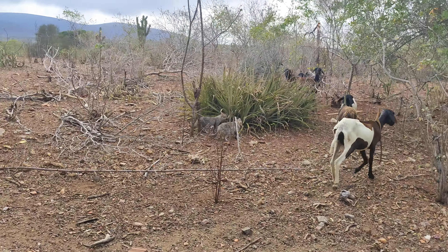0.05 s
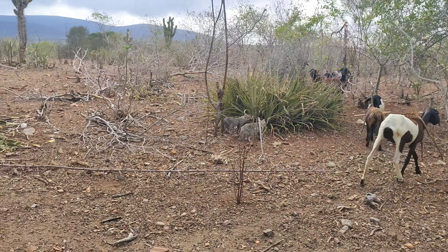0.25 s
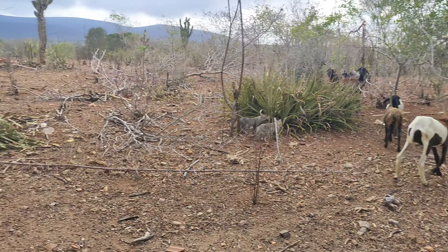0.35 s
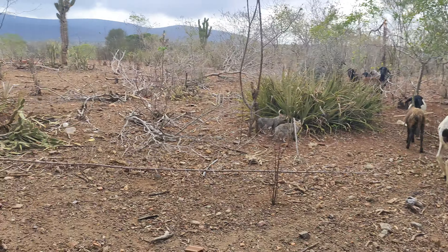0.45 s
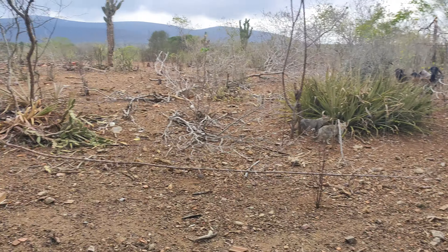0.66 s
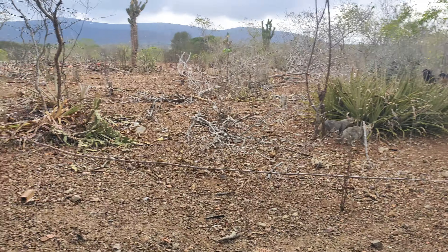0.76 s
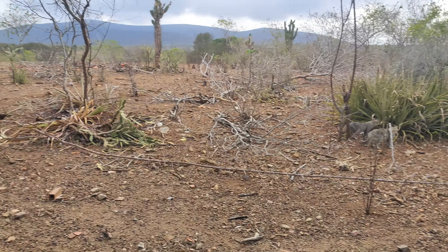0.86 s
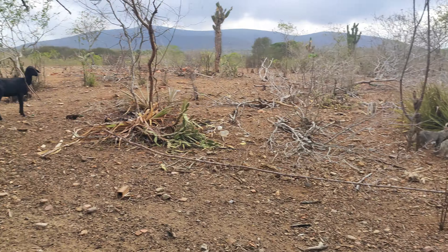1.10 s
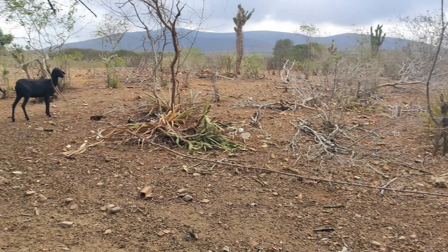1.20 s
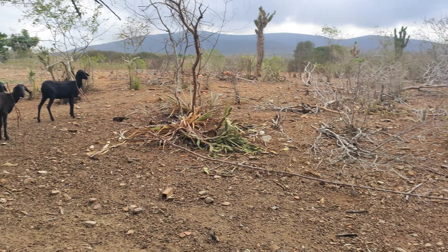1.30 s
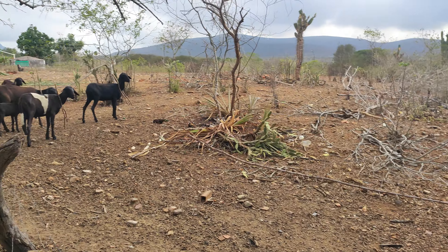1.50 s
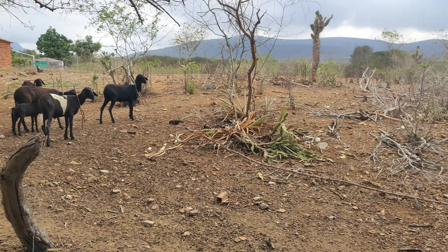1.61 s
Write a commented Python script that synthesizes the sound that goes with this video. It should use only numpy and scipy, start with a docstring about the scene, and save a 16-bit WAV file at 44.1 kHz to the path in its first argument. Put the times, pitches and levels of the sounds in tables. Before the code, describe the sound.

One trembling sheep bleat nearby, then a brief grunt, over faint scuffs and light wind.

```python
"""In dry scrub, a nearby sheep hums with its mouth shut, opens it into one quavering, partly hoarse bleat, then
grunts. Its voice is a source and a filter: pulses from the vocal folds excite the resonances of nose and mouth.
Feet scuff the ground by friction, stones and twigs click, something scrapes briefly late on, and far birds
whistle faintly. A light wind buffets the microphone, which turns away from the animal as it calls."""
import sys
import numpy as np
from scipy import signal
from scipy.fft import rfft, irfft, next_fast_len
from scipy.io import wavfile
from scipy.ndimage import map_coordinates

SR = 44100
rng = np.random.default_rng(int(sys.argv[2]) if len(sys.argv) > 2 else 0)


def output_pcm(signal):
    """Save a mono or channel-first signal as 16-bit PCM at the path in sys.argv[1].

    Samples are clipped to [-1, 1] before scaling.
    """
    pcm = np.clip(np.atleast_2d(signal).T, -1, 1) * 32767
    wavfile.write(sys.argv[1], SR, np.round(pcm).astype(np.int16))


N = 72765
T = np.arange(N) / SR
SIZE = next_fast_len(N + SR // 2)
HZ = np.fft.rfftfreq(SIZE, 1 / SR)


def amp(db):
    """Amplitude ratio for a level in decibels."""
    return 10 ** (np.asarray(db) / 20)

def unit(x):
    """Normalisation to unit rms."""
    return x / np.sqrt(np.mean(x ** 2) + 1e-20)

def spectrum(rows):
    """Interpolation of (f/Hz, value) rows on a logarithmic frequency axis."""
    f, value = np.transpose(rows)
    return np.interp(np.log(HZ + 1), np.log(f + 1), value)

def curve(rows):
    """Linear interpolation of (t/s, value) rows at every sample."""
    return np.interp(T, *np.transpose(rows))

def wobble(per_s):
    """Random modulation: straight lines join per_s Gaussian values a second."""
    return map_coordinates(rng.standard_normal(N), [T * per_s], order=1)

def filtered(x, response):
    """Linear filtering by multiplication of spectra."""
    return irfft(rfft(x, SIZE) * response, SIZE)[..., :N]

def sides(db):
    """Channel gains for a level difference, left minus right."""
    return amp(np.array([db, -db]) / 2).reshape(2, -1)


# Spectra of the hush and the wind: f/Hz, relative level/dB
HUSH_SPECTRUM = [(300, -2), (1400, -10.5), (1800, 0.5), (2250, 6), (2700, -9), (4200, -10.5), (8200, -38),
                 (8900, -17), (12000, -14), (15500, -28)]
WIND_SPECTRUM = [(35, 2), (80, 2), (800, -41.5)]
# Coherence of the hush between channels: f/Hz, correlation
HUSH_COHERENCE = [(100, 0.92), (1500, 0), (4000, 0)]
# Balance of hush and scuffs alike: f/Hz, left minus right level/dB
NOISE_BALANCE = [(1000, 2), (5000, 0), (9000, -17), (11500, -3), (14000, -0.5)]
# Strength of the buffeting: t/s, relative level/dB
WIND_LEVEL = [(0.0, -60.5), (0.776, -62.5), (0.79, -72), (1.65, -74.5)]

def air():
    """Ambient hush is coherent only in the bass; wind turbulence presses on each port independently."""
    angle = np.arccos(np.clip(spectrum(HUSH_COHERENCE), -1, 1)) / 2
    shares = np.array([np.cos(angle), np.sin(angle)])
    mid, side = filtered(rng.standard_normal((2, N)), amp(spectrum(HUSH_SPECTRUM)) * shares)
    hush = unit(filtered(np.array([mid + side, mid - side]), sides(spectrum(NOISE_BALANCE))))
    wind = unit(filtered(rng.standard_normal((2, N)), amp(spectrum(WIND_SPECTRUM))))
    return amp(-58) * hush + amp(curve(WIND_LEVEL) + 5.5) * wind * sides(db=4)


# Distant whistles: onset t/s, duration/s, first f/Hz, middle f/Hz, last f/Hz, level/dB
WHISTLE_NOTES = [(0.2, 0.055, 3700, 2870, 2620, -63), (-.03, 0.104, 2500, 2520, 2190, -55),
                 (0.29, 0.1184, 2270, 2448, 2240, -53)]

def birds():
    """Gliding pure tones, blurred by random phase modulation on their way through the scrub."""
    out = np.zeros(N)
    for start, length, first, middle, last, db in WHISTLE_NOTES:
        progress = np.clip((T - start) / length, 0, 1)
        hz = np.polyval(np.polyfit([0, .5, 1], [first, middle, last], 2), progress)
        phase = 2 * np.pi * np.cumsum(hz) / SR + .7 * wobble(per_s=260)
        arch = np.sqrt(np.abs(np.sin(np.pi * progress)))
        out += amp(db) * arch * np.sin(phase)
    return out * sides(db=6.5)


# Foot strokes: centre t/s, duration/s, level/dB
FOOT_STROKES = [(0.108, 0.024, -48), (0.416, 0.048, -51.5), (0.509, 0.078, -50), (0.72, 0.1, -55),
                (.818, 0.074, -48), (1.126, 0.24, -55.5)]
# Friction noise of dry soil: f/Hz, relative level/dB
FRICTION_SPECTRUM = [(150, -6), (700, -4), (2500, 5), (3300, -4), (6000, -12.5), (8300, -31.5),
                     (8900, -4.5), (11000, -5.5), (15500, -10.5)]

def scuffs():
    """Friction of feet on dry soil gives swells of gritty noise, which add in power."""
    power = sum(amp(db) ** 2 * np.exp(-(2 * (T - centre) / length) ** 2)
                for centre, length, db in FOOT_STROKES)
    grit = amp(3 * wobble(per_s=400)) * rng.standard_normal((2, N))
    response = amp(spectrum(FRICTION_SPECTRUM)) * sides(spectrum(NOISE_BALANCE))
    return np.sqrt(power) * unit(filtered(grit, response))


# Stones and twigs, and a brief scrape at 1.5 s: t/s, level/dB, centre f/Hz, width/octaves, 60 dB decay time/s
CLICKS_AND_SCRAPE = [(0.136, -48, 1130, 0.87, 0.059), (0.3383, -50.5, 9700, 1, 0.011),
                     (1.516, -58.5, 1210, 0.44, 0.11)]

def ticks():
    """Impacts on stones and twigs excite bands of noise that damping makes decay exponentially; a brief scrape
    late on sounds the same way."""
    out = np.zeros(N)
    for start, db, hz, octaves, t60 in CLICKS_AND_SCRAPE:
        band = np.exp(-.5 * (np.log2((HZ + 1) / hz) / octaves) ** 2)
        noise = unit(filtered(rng.standard_normal(N), band))
        out += amp(db - 60 * np.abs(T - start) / t60) * (T >= start) * noise
    return out


def vocal_folds(hz, roughness):
    """Glottal source: one pulse a cycle plus breath noise; roughness adds jitter, shimmer and rasp."""
    cycles = np.cumsum(hz) / SR
    onsets = np.interp(np.arange(1, int(cycles[-1])), cycles, np.arange(N))
    hiss = rng.standard_normal(N)
    jitter, shimmer = rng.standard_normal((SR // 50, 2))[:len(onsets)].T
    hoarse = roughness[onsets.astype(int)]
    # A second, slow vibration of the folds modulates the hoarse stretches.
    flutter_hz = 53 * (1 + .3 * wobble(per_s=53))
    flutter = 2 * np.pi * np.cumsum(flutter_hz)[onsets.astype(int)] / SR
    size_db = .55 * shimmer + hoarse * (2.2 * shimmer + 3.4 * np.cos(flutter))
    advance_s = hoarse * (.0004 * jitter + .00028 * np.sin(flutter))
    onsets = onsets - SR * advance_s
    # Windowed sinc pulses can fall between samples.
    taps = np.floor(onsets)[:, None] + np.arange(-7, 9)
    offset = taps - onsets[:, None]
    pulses = amp(size_db)[:, None] * np.sinc(offset) * np.cos(np.pi * offset / 16) ** 2
    train = np.bincount(np.clip(taps, 0, N - 1).astype(int).ravel(), pulses.ravel(), N)
    # Air rushes through the folds once a cycle, even where the voice is clear.
    puffs = hiss * (1 + np.cos(2 * np.pi * cycles))
    rasp, breath = (unit(filtered(puffs, HZ ** 2 / (HZ ** 2 + edge_hz ** 2))) for edge_hz in (500, 1300))
    return train + np.sqrt(hz / SR) * (.6 * roughness * rasp + .2 * breath)


def vocal_tract(source, formants, levels):
    """Resonance as a minimum-phase filter, its short-term rms made to follow (t/s, level/dB) rows."""
    cepstrum = irfft(np.log(amp(spectrum(formants))), SIZE)
    cepstrum[1:SIZE // 2] *= 2
    cepstrum[SIZE // 2 + 1:] = 0
    voice = filtered(source, np.exp(rfft(cepstrum)))
    window = signal.windows.hann(SR // 30)
    power = np.abs(signal.fftconvolve(voice ** 2, window / window.sum(), "same"))
    inside_s = np.minimum(T - levels[0][0], levels[-1][0] - T)
    fade = np.clip(inside_s / .0073 + 1, 0, 1)
    return amp(curve(levels)) * fade * voice / np.sqrt(power + 1e-12)


# Fundamental of the folds: t/s, f/Hz
BLEAT_PITCH = [(0.21, 180), (0.246, 143), (0.28, 148.2), (0.32, 182), (0.38, 201.5), (0.4, 244.4),
               (0.43, 257.3), (0.462, 220.4), (0.582, 211.9), (0.612, 227.1), (0.65, 285.1), (0.668, 270),
               (0.68, 281.9), (0.72, 261.1), (0.756, 296.4), (0.798, 267.6), (0.82, 275.2), (0.846, 264.2),
               (0.873, 296.9), (0.928, 265.4), (0.95, 244.4), (0.982, 256.1), (1.0, 253.5), (1.03, 266.5),
               (1.07, 238), (1.11, 247.5), (1.142, 184.9), (1.18, 159.4)]
# Irregularity of their vibration: t/s, roughness (0 to 1)
BLEAT_ROUGHNESS = [(.38, .09), (.41, .7), (.56, .7), (.585, .1), (.617, .12), (.625, .9), (.645, .9),
                   (.658, .1), (.752, .09), (.765, .7), (.835, .75), (.862, .1), (1.11, .06), (1.14, .16)]
# Resonances of nose and mouth: f/Hz, relative gain/dB
NASAL_FORMANTS = [(60, -21.5), (140, -2.5), (210, 0.5), (290, -4), (470, -35), (570, -27), (780, -10.5),
                  (1100, -24), (1300, -16), (1600, -28.5), (2300, -18), (2700, -72.5)]
BLARE_FORMANTS = [(430, -42.5), (660, 1), (900, -10.5), (1320, 7.5), (1560, -10), (1830, 3.5), (2200, -6),
                  (2470, 0), (2790, -9.5), (3100, -30), (4500, -49), (6000, -54)]
LOW_FORMANTS = [(200, -23.5), (450, -30.5), (580, -13.5), (730, 4), (820, 4.5), (930, -3.5), (1100, -6.5),
                (1800, -51)]
MIDDLE_FORMANTS = [(600, -46), (1080, -3), (1320, 9), (1480, -3.5), (1620, 5), (1800, -10.5), (2800, -50)]
RING_FORMANTS = [(900, -60), (1500, -9), (1780, 3), (1980, 9), (2220, 15), (2380, 8.5), (2520, -4.5),
                 (2900, -8.5), (3150, -31.5), (3540, -9.5), (3750, -44), (4200, -16.5), (5000, -56),
                 (6000, -22.5), (7500, -53.5)]
# Envelopes of those resonances: t/s, relative level/dB
NASAL_LEVEL = [(0.206, -93), (0.214, -47), (0.26, -52), (0.282, -56), (0.355, -42.5), (0.395, -41),
               (0.439, -47), (0.458, -40), (0.565, -40), (0.617, -41.5), (0.627, -52.5), (0.663, -48),
               (0.79, -49), (0.802, -77), (0.816, -51.5), (1.12, -48.5), (1.165, -46.5), (1.2, -75)]
BLARE_LEVEL = [(0.578, -76), (0.587, -35.5), (0.599, -34), (0.616, -31), (0.623, -60)]
LOW_LEVEL = [(0.58, -87), (0.6, -52.5), (0.64, -43), (0.79, -38.5), (0.805, -41), (0.829, -40), (0.95, -40),
             (1.119, -43), (1.161, -47.5), (1.184, -62.5)]
MIDDLE_LEVEL = [(0.62, -49), (0.719, -46), (0.846, -48), (0.87, -55), (0.941, -52.5), (0.985, -69),
                (1.056, -51.5), (1.148, -58), (1.175, -88)]
RING_LEVEL = [(0.574, -48.5), (0.616, -45), (0.626, -42.5), (0.652, -43), (0.658, -33.5), (0.698, -34.5),
              (0.792, -35.5), (0.805, -46), (0.816, -38.5), (0.89, -36.5), (0.981, -40), (1.075, -38.5),
              (1.133, -38), (1.156, -40.5), (1.175, -84)]

def bleat():
    """Parallel formants: a nasal hum, a blare as the lips part, then the trembling open mouth."""
    quiver = 1 + .0055 * wobble(per_s=110)
    source = vocal_folds(curve(BLEAT_PITCH) * quiver, curve(BLEAT_ROUGHNESS))

    def trembling(formants, levels, gain_db):
        """Random amplitude modulation of one group of mouth resonances."""
        return amp(gain_db + 1.1 * wobble(per_s=70)) * vocal_tract(source, formants, levels)

    hum = amp(3.5) * vocal_tract(source, NASAL_FORMANTS, NASAL_LEVEL)
    blare = vocal_tract(source, BLARE_FORMANTS, BLARE_LEVEL)
    low = trembling(LOW_FORMANTS, LOW_LEVEL, gain_db=4)
    middle = trembling(MIDDLE_FORMANTS, MIDDLE_LEVEL, gain_db=10.5)  # strongest with the jaw wide
    ring = trembling(RING_FORMANTS, RING_LEVEL, gain_db=2)  # bright, near 2 kHz
    return low - middle + ring - blare - hum


# Delay of the bleat at the left port as the microphone turns: t/s, lag/s
TURNING_LAG = [(.3, 0.00025), (.75, 0.00041), (1.1, 0.00045)]
# Phase difference between the ports: f/Hz, left lead/rad
PHASE_DIFFERENCE = [(30, 0.064), (240, 0.32), (800, 0.79), (1350, 0.93), (2000, 0.49)]
# Level difference between the ports: f/Hz, left minus right level/dB
LEVEL_DIFFERENCE = [(400, 0), (800, 1.5), (1300, 1.5), (1600, 9), (2100, 10), (2500, 2), (3000, 11),
                    (5500, 0)]

def microphone_ports(x, lag_s):
    """Path difference: a near sound reaches the two ports with unequal delay, phase and level."""
    pair = np.array([map_coordinates(x, [(T + side * lag_s / 2) * SR]) for side in (-1, 1)])
    phase_shift = np.exp(.5j * np.outer([1, -1], spectrum(PHASE_DIFFERENCE)))
    return filtered(pair, sides(spectrum(LEVEL_DIFFERENCE)) * phase_shift)


def scrub_echo(x, db, t60_s):
    """Scattering from bushes and ground adds a diffuse, exponentially decaying tail."""
    t = T[:SR // 2]
    rise = 1 - np.exp(-t / .0017)
    tail = rng.standard_normal((2, len(t))) * amp(-60 * t / t60_s) * rise
    return amp(db) * signal.fftconvolve(x, tail / np.linalg.norm(tail[0]), axes=1)[:, :N]


# Fundamental of the grunt: t/s, f/Hz
GRUNT_FUNDAMENTAL = [(1.343, 250), (1.356, 488.5), (1.366, 506.5), (1.39, 219)]
# Its resonances: f/Hz, relative gain/dB
GRUNT_FORMANTS = [(80, -25), (200, 13.5), (520, 12.5), (900, 12), (1100, 4), (1420, 11.5), (1900, -3),
                  (2600, -38)]
# Its envelope: t/s, level/dB
GRUNT_ENVELOPE = [(1.343, -49), (1.358, -46), (1.375, -55), (1.388, -41.5), (1.398, -40), (1.408, -59)]

def grunt():
    """Low formants dull a brief glottal source whose pitch flips up, then drops into creaky pulses."""
    source = vocal_folds(curve(GRUNT_FUNDAMENTAL), roughness=np.full(N, .25))
    return vocal_tract(source, GRUNT_FORMANTS, GRUNT_ENVELOPE)


def scene():
    """Superposition of the sheep's direct sound, its echo and the sounds of the scrub."""
    sheep = microphone_ports(bleat(), curve(TURNING_LAG)) + microphone_ports(grunt(), lag_s=.00029)
    return sheep + scrub_echo(sheep, db=-18, t60_s=.16) + scuffs() + ticks() + birds() + air()


def record(dry):
    """Band limiting: an ideal low-pass filter removes the highest treble."""
    return filtered(dry, HZ < 15850)


dry = scene()
out = record(dry)
output_pcm(out)
```